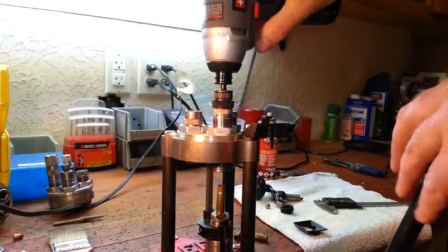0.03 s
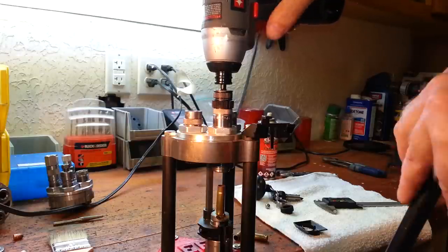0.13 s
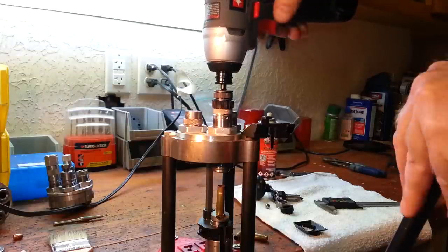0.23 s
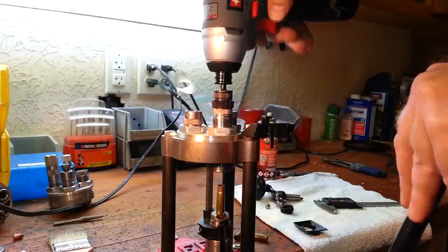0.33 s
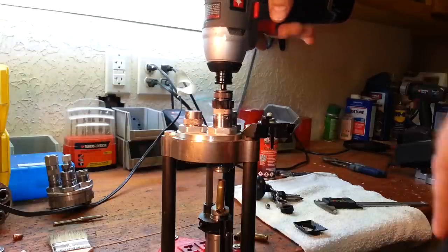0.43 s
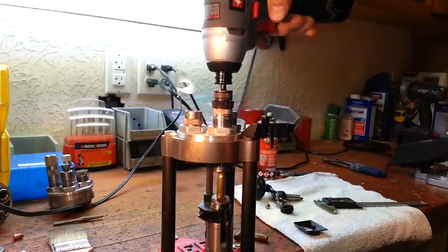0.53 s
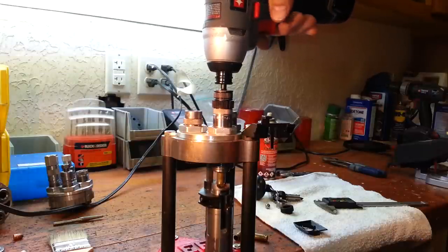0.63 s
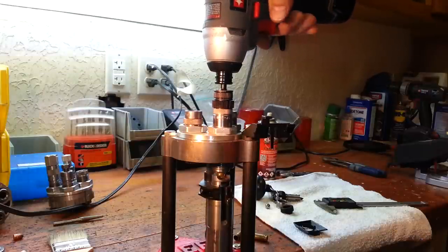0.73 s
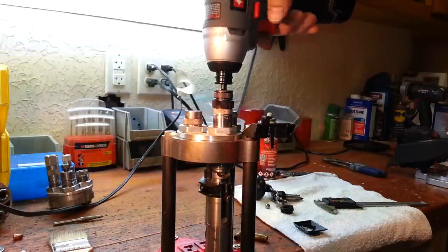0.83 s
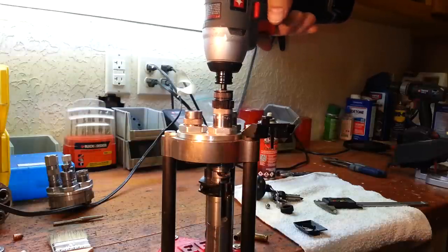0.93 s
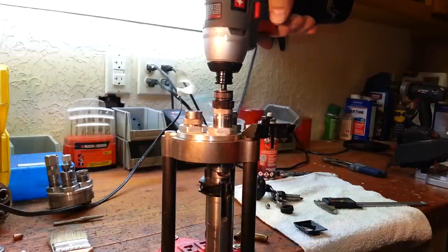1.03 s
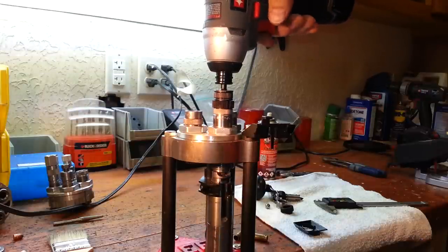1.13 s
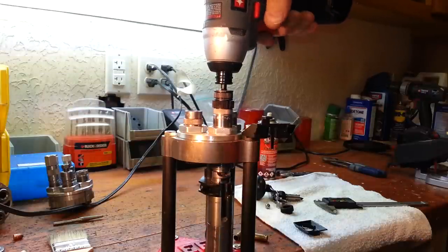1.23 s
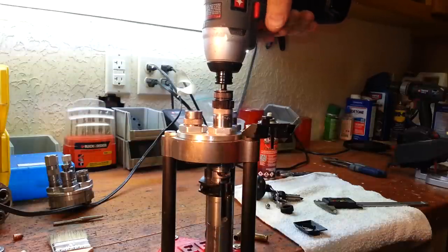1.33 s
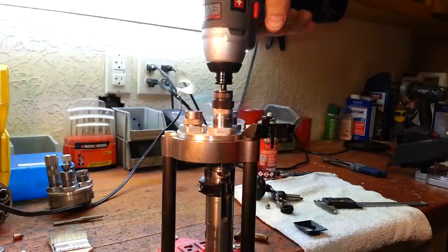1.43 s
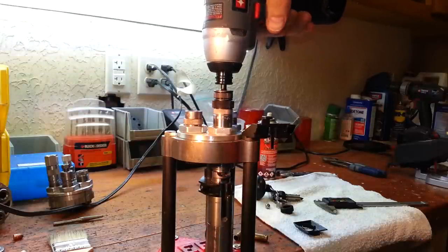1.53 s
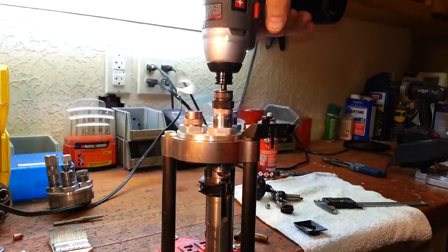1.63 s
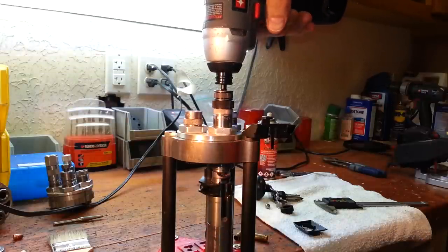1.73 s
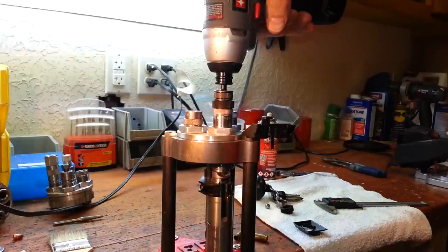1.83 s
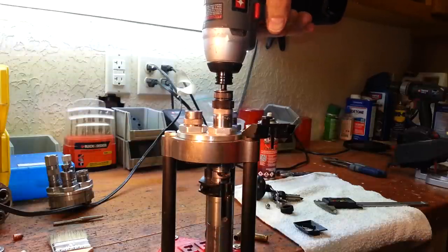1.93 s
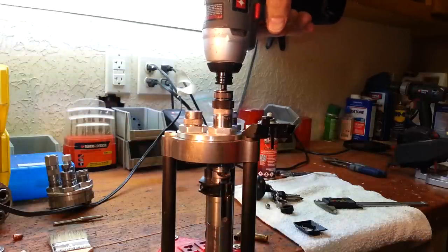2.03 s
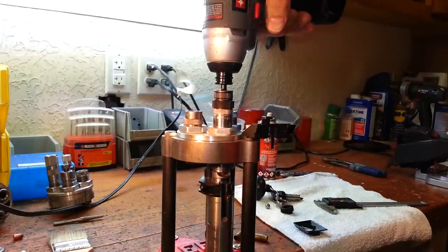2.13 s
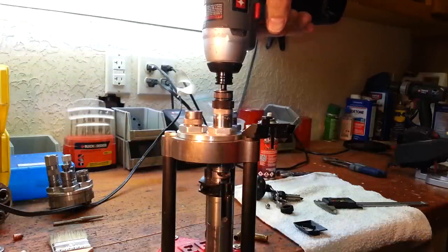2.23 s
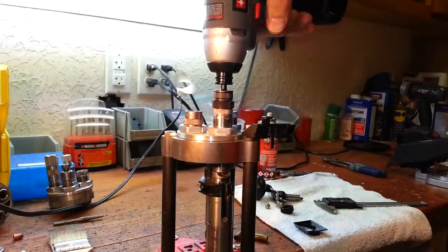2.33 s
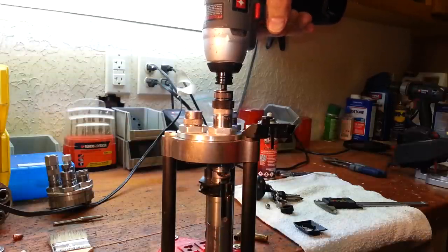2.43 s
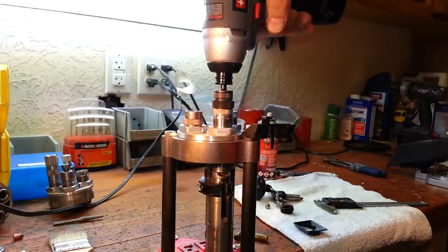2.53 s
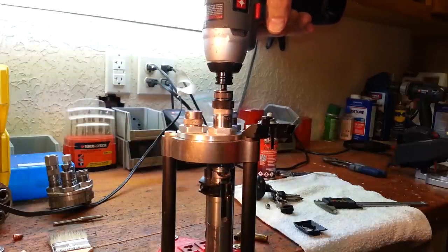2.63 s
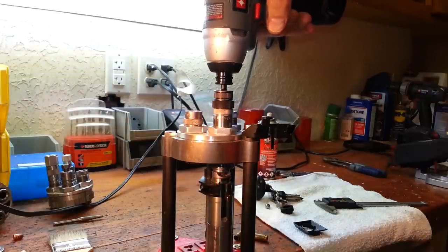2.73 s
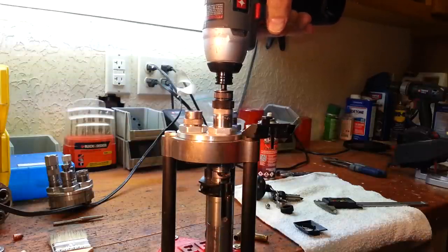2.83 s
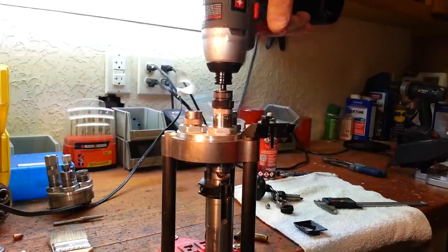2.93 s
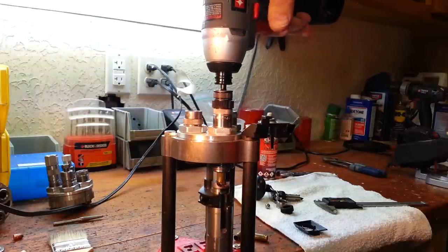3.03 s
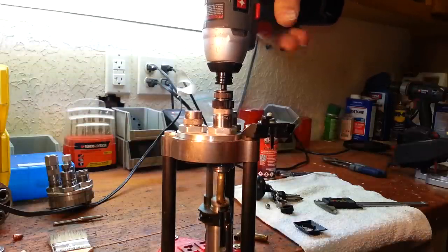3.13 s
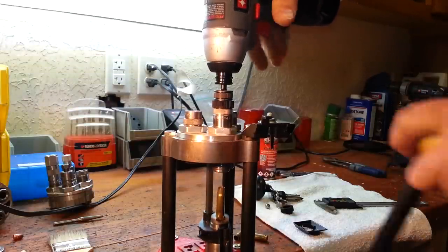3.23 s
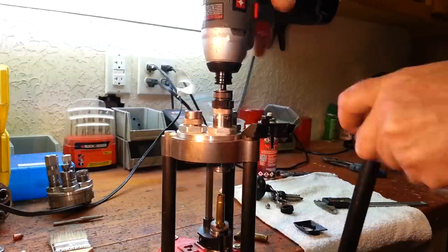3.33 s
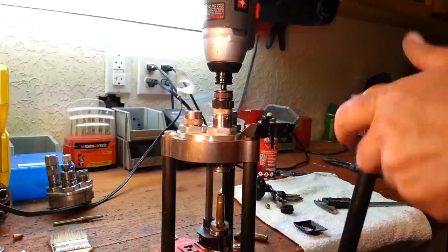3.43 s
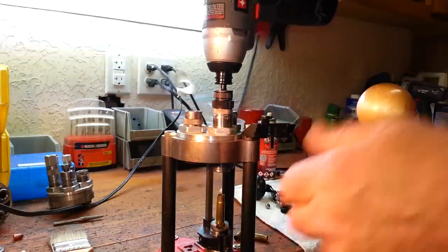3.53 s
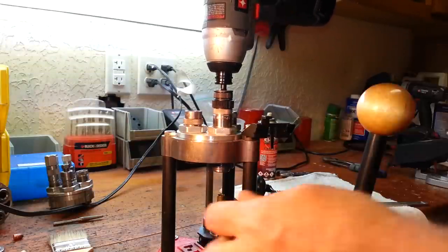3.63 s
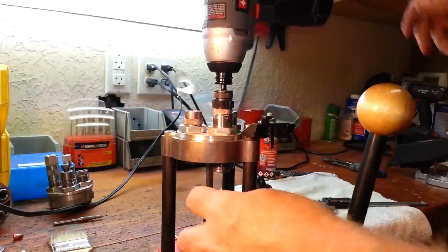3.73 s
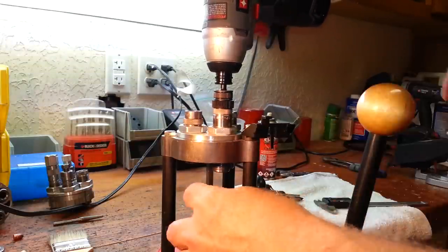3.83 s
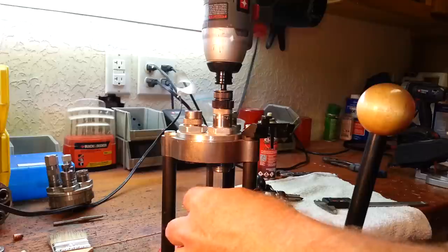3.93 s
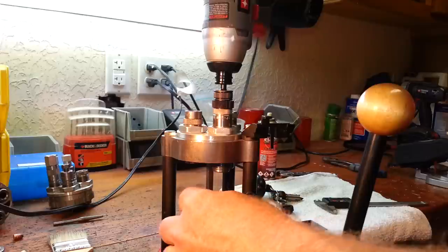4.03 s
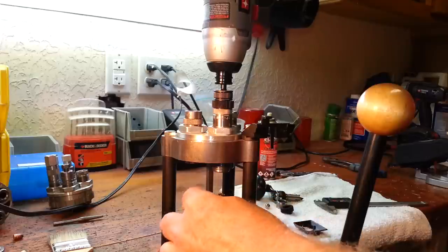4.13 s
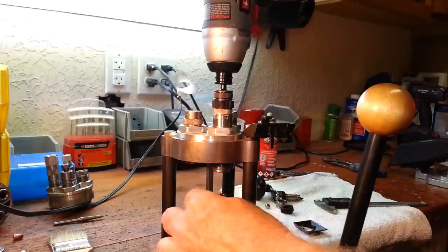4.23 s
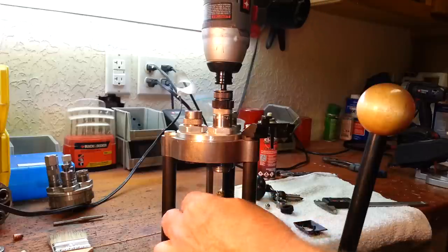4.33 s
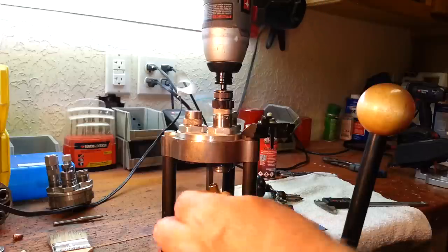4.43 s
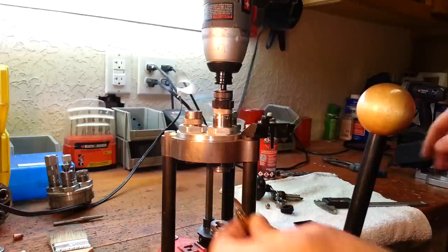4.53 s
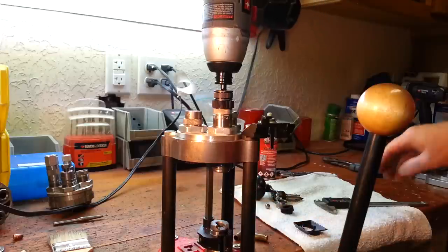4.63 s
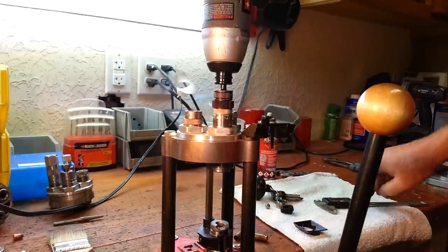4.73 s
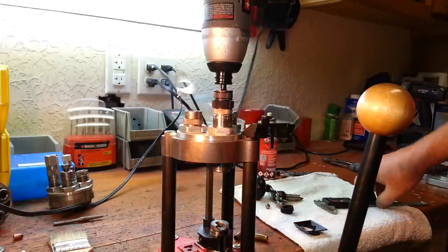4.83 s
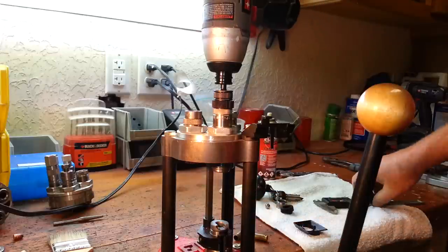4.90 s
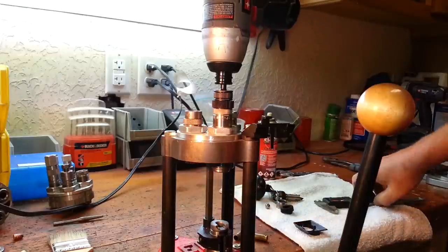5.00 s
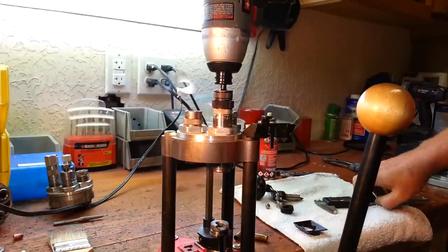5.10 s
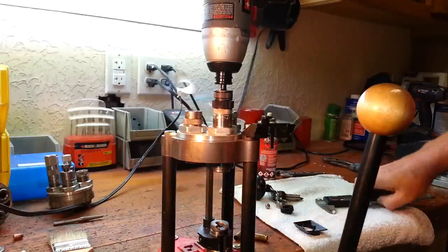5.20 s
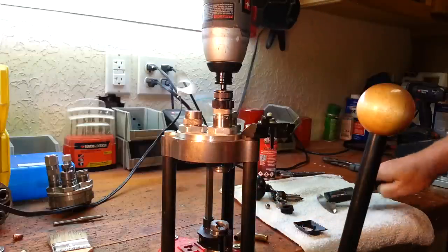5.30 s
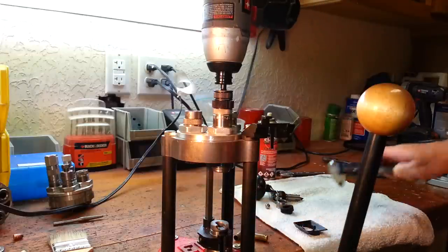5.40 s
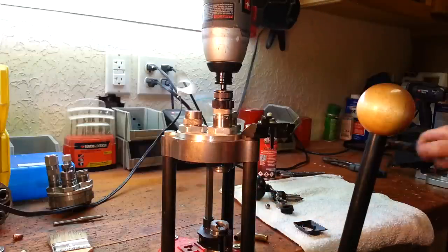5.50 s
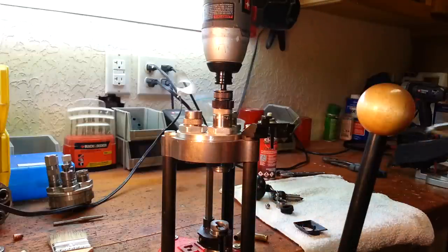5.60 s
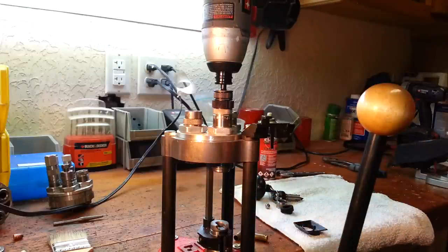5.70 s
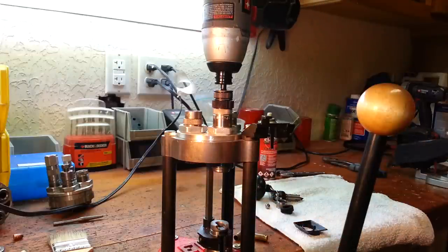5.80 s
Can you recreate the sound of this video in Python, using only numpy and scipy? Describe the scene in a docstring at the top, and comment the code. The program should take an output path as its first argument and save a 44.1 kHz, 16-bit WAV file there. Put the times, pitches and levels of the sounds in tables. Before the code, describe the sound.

In a small workshop, a press ram rubs and its lever knocks and thumps. An electric driver bursts into a rough gear whine with cutter chatter, holds steady about one and a half seconds, then stops with a heavy thump and quick wind-down. Linkage clanks and sparse light clicks follow as the brass case is removed and set down. Close stereo microphone, short room echo, faint low hush.

```python
"""An electric driver, mounted on a bench press, whines and grinds for a second and a half as it trims a
brass case, shaking the bench, then winds down: tooth-order tones, scraping noise and cutter chatter follow
one shaft angle. Around it the lever knocks and the case is picked out with light clicks (noise bursts and
damped modes), loose cases ring, and ram and hand rub (swelling noise). A small workshop echoes driver,
knocks and rings over a steady noise background."""
import sys
import numpy as np
from scipy import signal
from scipy.fft import rfft, irfft, next_fast_len
from scipy.io import wavfile
from scipy.ndimage import map_coordinates

SR = 44100
rng = np.random.default_rng(int(sys.argv[2]) if len(sys.argv) > 2 else 0)


def output_pcm(signal):
    """Save a mono or channel-first signal as 16-bit PCM at the path in sys.argv[1].

    Samples are clipped to [-1, 1] before scaling.
    """
    pcm = np.clip(np.atleast_2d(signal).T, -1, 1) * 32767
    wavfile.write(sys.argv[1], SR, np.round(pcm).astype(np.int16))


N = 258426
TIME = np.arange(N) / SR


def amp(db):
    """Level law: decibels to amplitude gain."""
    return 10 ** (np.asarray(db) / 20)


def unit(x):
    """Normalisation: scale to rms 1."""
    return x / np.sqrt(np.mean(x ** 2) + 1e-20)


def along(points, hz):
    """Logarithmic pitch scale: interpolate (Hz, value) points on a log axis."""
    f, v = np.transpose(points)
    return np.interp(np.log(hz + 1), np.log(f + 1), v)


def curves(rows):
    """Linear interpolation: one value per sample for each column after the time."""
    s, *cols = np.transpose(rows)
    return [np.interp(TIME, s, c) for c in cols]


def ramp(start, length):
    """Linear onset: a rise from 0 to 1 that begins at start."""
    return np.clip((TIME - start) / length, 0, 1)


def fade(start, life):
    """Exponential relaxation: 1 until start, then a fall with time constant life."""
    return np.exp(-np.maximum(TIME - start, 0) / life)


def wobble(rate):
    """Band-limited fluctuation: a smooth random curve, rate knots a second."""
    knots = rng.standard_normal(int(N * rate / SR) + 4)
    return map_coordinates(knots, [np.arange(N) * rate / SR])


def cycle(turns, lag=0):
    """Harmonic motion: a swing once per turn."""
    return np.cos(2 * np.pi * (turns - lag))


def filtered(x, response):
    """Linear filtering: x times a complex response of frequency."""
    n = x.shape[-1]
    m = next_fast_len(n + SR // 4)
    return irfft(rfft(x, m) * response(np.fft.rfftfreq(m, 1 / SR)), m)[..., :n]


def panned(pan_db):
    """Intensity stereo: left and right gains of constant power."""
    g = amp(np.array([np.atleast_1d(pan_db), -np.atleast_1d(pan_db)]) / 2)
    return g / np.sqrt(np.mean(g ** 2, axis=0))


# Left-right correlation of near sources: pitch_hz [Hz], likeness [0 to 1]
NEAR_LIKENESS = [(150, 1), (340, 0.76), (600, 0.79), (1200, 0.082), (12000, 0)]


def rush(spectrum, alike, size=N):
    """Interchannel correlation: coloured stereo noise of rms 1, mixed from independent mid and side."""
    def shape(hz):
        turn = np.arccos(np.clip(along(alike, hz), -1, 1)) / 2
        return amp(along(spectrum, hz)) * np.array([np.cos(turn), np.sin(turn)])

    mid, side = filtered(rng.standard_normal((2, size)), shape)
    return unit(np.array([mid + side, mid - side]))


def resonate(x, modes):
    """Modal resonance: x through parallel modes, each two equal band-pass stages in series, at rms 1."""
    def response(f):
        return sum(amp(db) * (1j * f * w / (c * c - f * f + 1j * f * w)) ** 2 for c, w, db in modes)

    return unit(filtered(x, response))


def add(track, s, sound):
    """Superposition: mix a sound in at time s."""
    start = max(0, round(s * SR))
    track[:, start:start + sound.shape[-1]] += sound[..., :N - start]


# Background spectrum: pitch_hz [Hz], level_db [relative dB per Hz]
BACKGROUND_SPECTRUM = [(15, -43.5), (25, -21), (127, 2), (247, -6), (480, -11), (644, -14.5), (755, -15),
                       (1290, -22), (2250, -22), (4740, -24), (6020, -28.5), (8290, -25), (13000, -26),
                       (14500, -27)]
# Left-right correlation of the background: pitch_hz [Hz], likeness [0 to 1]
BACKGROUND_LIKENESS = [(60, 0.11), (240, 0.24), (950, 0.088), (3770, 0.0099), (15000, 0.11)]


def background():
    """Stationary noise: a steady, mostly low-pitched hush, nearly unrelated left and right."""
    return amp(-56.5) * rush(BACKGROUND_SPECTRUM, BACKGROUND_LIKENESS)


# Reverberation time: pitch_hz [Hz], t60_s [s for a 60 dB fall]
REVERBERATION = [(150, 0.19), (400, 0.42), (1500, 0.57), (4000, 0.42), (7000, 0.36), (14000, 0.082)]


def room(x):
    """Reverberation: convolution with noise that decays in each band; the highest treble dies soonest."""
    colour = [(120, -4.5), (340, -8.5), (700, -4.5), (2500, -4), (6000, -5.5), (12000, 1.5)]  # Hz, dB
    hz, t, z = signal.stft(rush(colour, NEAR_LIKENESS, size=SR // 2), SR, nperseg=256)
    decay = amp(-60 * t / along(REVERBERATION, hz)[:, None])
    tail = signal.istft(z * decay, SR, nperseg=256)[1]
    # the echo starts 5 ms after the direct sound
    tail = np.pad(tail / np.linalg.norm(tail[0]), ((0, 0), (SR // 200, 0)))
    return signal.fftconvolve(x, tail, axes=1)[:, :N]


# Rubbing of ram and hand: start_s [s], length_s [s], level_db [dB]
STROKES = [(0, .88, -57), (0.844, 0.26, -58), (3.34, 0.1, -47.5), (4.08, 0.41, -66.5)]
# Spectrum of the rubbing: pitch_hz [Hz], level_db [relative dB per Hz]
RUB_SPECTRUM = [(60, -18), (200, -6.5), (350, 7), (900, -0.5), (1800, 1), (4000, -6.5), (7000, -12),
                (14000, -14)]
STROKE_RISE_S, STROKE_FALL_S = 0.21, .11  # linear rise; time constant of the fall
RUSTLE_DB = -68.5  # the faint rustle between strokes


def slide():
    """Friction noise: the ram rubs in its guide and a hand moves over the bench."""
    strokes = sum(amp(db) * ramp(s, STROKE_RISE_S) * fade(s + length, STROKE_FALL_S)
                  for s, length, db in STROKES)
    strength = np.hypot(strokes, amp(RUSTLE_DB)) * amp(2.2 * wobble(25))
    return strength * rush(RUB_SPECTRUM, NEAR_LIKENESS)


# Touches of loose brass cases: start_s [s], level_db [dB]
CLINKS = [(0.004, -54), (0.04, -63), (5.761, -57.5)]
# Ringing modes of the brass: pitch_hz [Hz], level_db [relative dB], t60_s [s]
BRASS_MODES = [(2800, 0, 0.044), (3390, 4, 0.083), (3417, 2, 0.06), (3570, 4.5, .12), (4320, 2, .1)]


def clinks():
    """Damped free vibration: loose cases touch and ring briefly, buzzing against each other."""
    out, t = np.zeros((2, N)), np.arange(SR // 4) / SR
    for s, db in CLINKS:
        ring = np.zeros((2, len(t)))
        for hz, level, t60 in BRASS_MODES:
            buzz = .16 * wobble(160)[:len(t)]
            ring += amp(level - 60 * t / t60) * cycle(hz * t + buzz, rng.random((2, 1)))
        add(out, s, amp(db) * ring)
    return out


# Spectrum of the struck bench: pitch_hz [Hz], level_db [relative dB per Hz]
BOOM_SPECTRUM = [(85, -39), (135, 8.5), (190, -1), (270, 3.5), (400, 2), (620, 1.5), (900, -11.5),
                 (2000, -36.5)]
# Spectrum of the steel linkage: pitch_hz [Hz], level_db [relative dB per Hz]
CLANK_SPECTRUM = [(350, -17.5), (620, -4), (740, -5.5), (900, 6), (1080, 0.5), (1270, -3.5), (1550, -17.5),
                  (2400, -36)]


def contact(boom_db, thud_db, clank_db, click_db, tick_db):
    """Impact excitation: a click first; milliseconds later linkage clank, heavy frame thud and bench boom."""
    t = np.arange(SR // 3) / SR

    def swell(peak_s):
        return t / peak_s * np.exp(1 - t / peak_s)

    def burst(colour):
        return rush(colour, NEAR_LIKENESS, size=len(t))

    def struck(t60_s, rise_s):
        return amp(-60 * t / t60_s) * (1 - np.exp(-t / rise_s))

    boom = burst(BOOM_SPECTRUM) * struck(0.41, .003)
    frame_tones = [(340, 1), (430, 0.078), (290, 0.27)]  # Hz, gain
    thud = swell(0.0096) ** 3 * sum(gain * cycle(hz * t, rng.random()) for hz, gain in frame_tones)
    clank = burst(CLANK_SPECTRUM) * swell(0.0085) ** 2
    click_colour = [(500, -15), (1400, 4), (2800, 0.5), (4600, -12.5), (6200, -37.0)]  # Hz, dB
    click = burst(click_colour) * struck(0.065, 0.00072)
    tick_colour = [(3000, -11), (5500, 2.0), (10000, -6.5), (14000, -14)]  # Hz, dB
    tick = burst(tick_colour) * struck(0.058, 0.0015)
    body = amp(boom_db) * boom + amp(thud_db) * thud + amp(clank_db) * clank
    return body + amp(click_db) * click + amp(tick_db) * tick


# The ram, and the motor as it starts and brakes, jolt the frame:
# start_s [s], level_db [dB], click_db [relative dB]
THUMPS = [(.585, -41, -20), (.643, -38.5, -27), (0.856, -40, -9), (.914, -21.5, -4.5), (.989, -36, -10),
          (1.093, -22, -27), (1.562, -21, -8.5), (3.116, -15, -12), (3.189, -24.5, -8)]
# The lever's linkage takes up its play: start_s [s], level_db [dB], click_db [relative dB]
CLANKS = [(.388, -36.5, 0), (.423, -41, -5), (0.768, -35.5, -7), (3.411, -36, -1.5), (3.473, -36.5, -9),
          (4.273, -49, -5), (4.332, -51.5, -18.5)]
# Light contacts of case, shell holder and trigger: start_s [s], level_db [dB], tick_db [relative dB]
CLICKS = [(.764, -36.5, -1.5), (.771, -44, -5), (1.497, -52, -4), (1.526, -38, -1.5), (4.171, -44.5, -1.5),
          (4.503, -46.5, -14), (5.426, -56, 3), (5.76, -56, -17)]
SET_DOWN_S, SET_DOWN_DB = 5.396, -48  # the trimmed case is put down on the bench


def knocks():
    """Impact response: thumps sound mostly in the frame, clanks in the linkage, clicks at the contact."""
    out = np.zeros((2, N))
    for s, db, click_db in THUMPS:
        thump = contact(boom_db=-14.5, thud_db=-2.0, clank_db=-17.5, click_db=click_db, tick_db=-41)
        add(out, s, amp(db) * thump)
    for s, db, click_db in CLANKS:
        clank = contact(boom_db=-9, thud_db=-2.5, clank_db=-2, click_db=click_db, tick_db=-20)
        add(out, s, amp(db) * clank)
    for s, db, tick_db in CLICKS:
        click = contact(boom_db=-12, thud_db=-6, clank_db=-12, click_db=0, tick_db=tick_db)
        add(out, s, amp(db) * click)
    set_down = contact(boom_db=-1, thud_db=-4.5, clank_db=-11, click_db=-8, tick_db=-18)
    add(out, SET_DOWN_S, amp(SET_DOWN_DB) * set_down)
    return out


def windings():
    """Magnetic excitation: the speed switch makes the stalled windings sing just before the rotor moves."""
    gate = np.interp(TIME, [1.541, 1.546, 1.556, 1.56], [0, 1, 1, 0])
    tones = cycle(3900 * TIME) + 0.339 * cycle(7800 * TIME) + .8 * cycle(335 * TIME)
    return amp(-38) * gate * tones


SPINDLE = 22  # motor turns per spindle turn


def chatter(turns, scatter, count=22):
    """Periodic impact: the cutter catches at the same angles on every spindle turn, never quite alike."""
    angle, force = rng.random(count), rng.standard_normal(count)
    places = (np.arange(int(turns[-1] / SPINDLE))[:, None] + angle) * SPINDLE
    blows = force + scatter * rng.standard_normal(places.shape)
    return np.bincount(np.searchsorted(turns, places.ravel()), blows.ravel(), N + 1)[:N]


def lines(table, shaft):
    """Order spectrum: tones at multiples of a shaft's speed, with slightly straying phase."""
    return sum(amp(db) * np.sqrt(2) * cycle(order * shaft + 0.069 * wobble(25)) for order, db in table)


# Gear whine: order [multiple of the tooth rate], level_db [relative dB], pan_db [left-right dB],
# throb_db [dB], roughness [cycles of phase]
WHINE = [(1.012, -12.5, 5.5, 2, 0.13), (2, -15.5, 1.5, 3.5, 0.16), (2.966, -12, -10, 8.5, 0.0319),
         (3.995, -10.5, -17.5, -2.5, 0.085), (4.98, -7, -16, 3, 0.24), (6, -19.5, -0.5, -1, .2),
         (6.96, -20, -4.5, 2.5, 0.3), (7.96, -19, -11.5, 2, 0.19), (8.96, -18, -16.5, -1, 0.19),
         (10, -26, -9, -3, 0.22)]
# Spectrum of the tooth scrape: pitch_hz [Hz], level_db [relative dB per Hz]
SCRAPE_SPECTRUM = [(240, -41), (400, -12), (548, -9), (719, -7.5), (848, -9.5), (1460, -3), (1940, -7.5),
                   (3750, -6), (4290, -0.5), (4990, -9.5), (7050, -8), (9380, -17.5), (14500, -14.5)]
# Balance of the tooth scrape: pitch_hz [Hz], pan_db [left-right dB]
SCRAPE_PAN = [(400, -5.5), (1000, -1.5), (2500, -1.5), (5000, -1), (7000, -7), (13000, -6.5)]
TEETH = 4  # teeth met per motor turn
CARRIER, CUTTER = 11, 25  # motor turns per turn of each
ON_S, OFF_S = 1.558, 3.085  # trigger pulled and let go


def gears(turns):
    """Gear meshing with modulation: planet carrier and cutter drag make the tooth whine flutter and throb."""
    flutter = .042 * cycle(turns / CARRIER, lag=0.67) + 0.069 * cycle(turns / CUTTER, lag=.36)
    # the gears clatter while they speed up and sing once they are seated
    loose = 1 - ramp(1.61, 0.068)
    jitter = 0.056 * loose * wobble(150) + 0.0059 * wobble(70) + 0.014 * wobble(700)
    teeth = TEETH * turns + flutter + jitter
    throb = cycle(turns / CARRIER, lag=.87) + .4 * cycle(2 * turns / CARRIER, lag=.8)
    whine = np.zeros((2, N))
    for order, db, pan_db, throb_db, rough in WHINE:
        # rough partials stray in phase and in strength, clean ones pulse evenly
        phase = order * teeth + rough * wobble(170) + rng.random() + np.array([[0], [1 / 6]])
        strength = amp(db + throb_db * throb + 10 * rough * wobble(90))
        whine += panned(pan_db) * strength * np.sqrt(2) * cycle(phase)
    # every tooth scrapes as it meets the next
    noise = rush(SCRAPE_SPECTRUM, NEAR_LIKENESS)
    scrape = unit(filtered(noise, lambda hz: panned(along(SCRAPE_PAN, hz))))
    bite = amp(4.9 * cycle(teeth) + 0.88 * throb + 1.6 * wobble(250))
    bite /= np.sqrt(np.mean(bite[round(ON_S * SR):round(OFF_S * SR)] ** 2))
    return amp(-0.78 - 1.5 * loose) * whine + amp(-0.19 + 2.0 * loose) * scrape * bite


# Running speed before spin-up and braking: start_s [s], speed [motor turns per s]
SPEED = [(1.85, 357), (2.3, 360.8), (2.65, 359), (3.085, 357.3)]
# Rotor imbalance: order [multiple of the motor speed], level_db [relative dB]
HUM = [(.997, -7)]
# The hum's beats with the cutter and its overtone: order [multiple of the motor speed], level_db [relative dB]
BEATS = [(.878, -12.5), (.957, -9), (1.987, -14.5)]
# Modes of the press frame: pitch_hz [Hz], width_hz [Hz, each stage], level_db [relative dB]
FRAME_MODES = [(307.5, 29, -4), (330.4, 38.4, -1)]
# Modes of the bench top: pitch_hz [Hz], width_hz [Hz, each stage], level_db [relative dB]
BENCH_MODES = [(137.6, 10, 2.5), (157.1, 13, -1.5), (205.9, 38, -6)]
# The wobbling chuck rocks the bench: order [multiple of the spindle speed], level_db [relative dB]
SHUDDER = [(8, -5.5), (9, -6)]
START_LACK, SPIN_UP_S, BRAKE_S = .72, .04, .13  # share of speed lacking after the first kick; time constants
ATTACK_S, RELEASE_S, EASE_S = 0.014, 0.041, 3.068  # the torque builds, and fades once the finger eases
GEAR_DB, FRAME_DB, HUM_DB, BENCH_DB = -19, -32, -25, -35.5  # base levels at full speed
SURGE_S, GEAR_SURGE_DB, FRAME_SURGE_DB = 0.2, 5, 8  # the first bite is the hardest and dies away
# the cutter settles on the case: the hum grows, the rattle and beats weaken
SEAT_S, SEAT_RISE_S = 2.67, .12
SEAT_HUM_DB, SEAT_BENCH_DB, SEAT_RATTLE_DB = 8, 0.5, -1
COAST_DB, FRAME_COAST_DB, HUM_COAST_DB = -17.5, -5.5, -16  # gears, frame rattle, hum without torque


def driver():
    """Order-locked excitation: whine, hum and chatter follow the motor shaft, scaled by torque and speed."""
    # share of full speed
    pace = (TIME > ON_S) * (1 - START_LACK * fade(ON_S, SPIN_UP_S)) * fade(OFF_S, BRAKE_S)
    turns = np.cumsum(pace * curves(SPEED)[0]) / SR
    started, released = np.sqrt(ramp(ON_S, ATTACK_S)), ramp(EASE_S, RELEASE_S)
    surge, seated = fade(ON_S, SURGE_S), ramp(SEAT_S, SEAT_RISE_S)

    gear_gain = amp(GEAR_DB + GEAR_SURGE_DB * surge + COAST_DB * released)
    gearbox = started * pace ** 1.03 * gear_gain * gears(turns)

    hum_gain = amp(HUM_DB + HUM_COAST_DB * released + 1.1 * wobble(14))
    imbalance = amp(SEAT_HUM_DB * seated) * lines(HUM, turns)
    beats = amp(SEAT_RATTLE_DB * seated) * lines(BEATS, turns)
    hum = pace ** 2 * hum_gain * (imbalance + beats)

    rattle_gain = amp(FRAME_DB + SEAT_RATTLE_DB * seated + FRAME_SURGE_DB * surge
                      + FRAME_COAST_DB * released)
    rattle = pace ** .7 * rattle_gain * resonate(chatter(turns, scatter=0.93), FRAME_MODES)
    frame = amp(1.1 * cycle(turns / CARRIER, lag=.725)) * (rattle + hum)

    shaken = amp(-4.0) * resonate(chatter(turns, scatter=0.79), BENCH_MODES)
    shudder = shaken + lines(SHUDDER, turns / SPINDLE)
    bench = pace ** 5 * amp(BENCH_DB + SEAT_BENCH_DB * seated) * shudder

    whole = gearbox + started * (panned(2.0) * frame + panned(-.7) * bench) + windings()
    # the small body radiates hardly any deep bass
    return signal.sosfilt(signal.butter(3, 105, "highpass", fs=SR, output="sos"), whole)


def scene():
    """Direct and reverberant sound: driver and handling in the room, over rubbing and steady background."""
    tool, handling = driver(), knocks() + clinks()
    echo = room(amp(-6.5) * tool + amp(-4.0) * handling)
    return amp(-0.5) * tool + handling + echo + slide() + background()


TOP_HZ = 14560  # middle of the upper band edge


def record(dry):
    """Soft saturation and band limiting: the highest peaks are rounded and the top treble is cut off."""
    rounded = dry / (1 + np.abs(dry / .88) ** 8) ** (1 / 8)
    # a smooth edge 240 Hz wide
    return filtered(rounded, lambda hz: np.sin(np.pi / 2 * np.clip((TOP_HZ + 120 - hz) / 240, 0, 1)) ** 2)


dry = scene()
out = record(dry)
output_pcm(out)
```